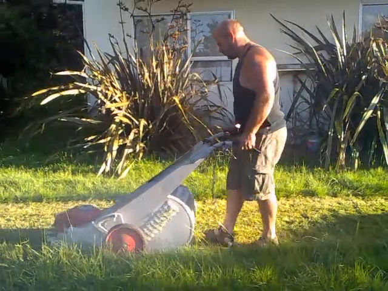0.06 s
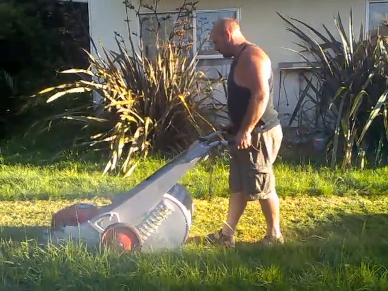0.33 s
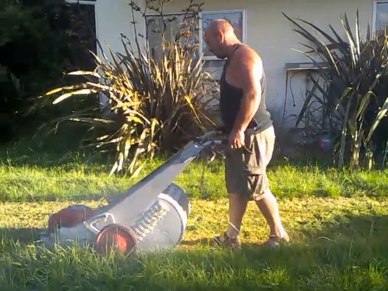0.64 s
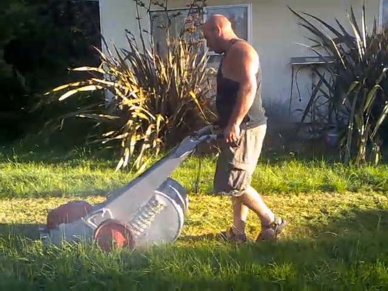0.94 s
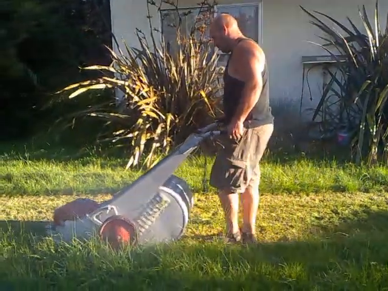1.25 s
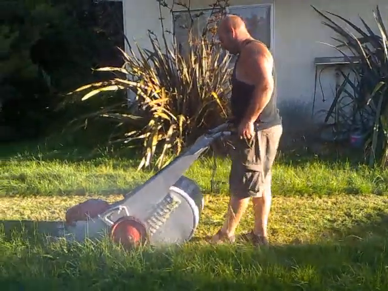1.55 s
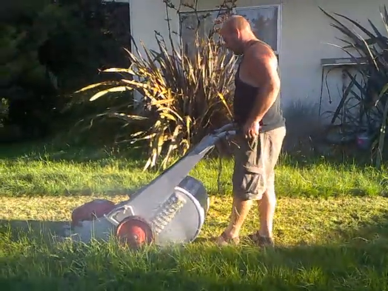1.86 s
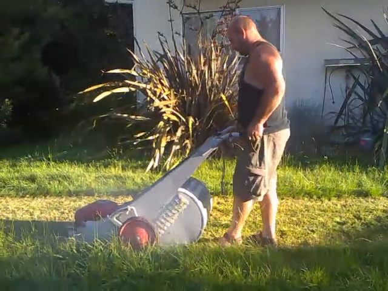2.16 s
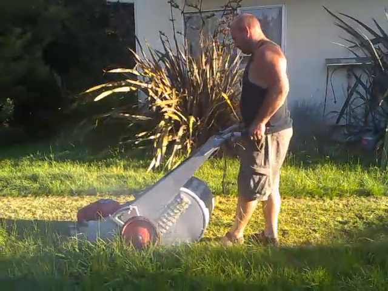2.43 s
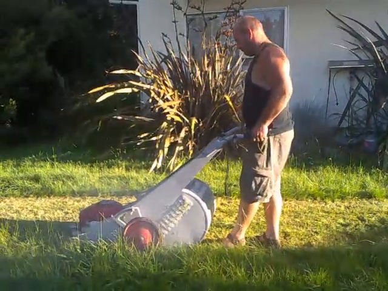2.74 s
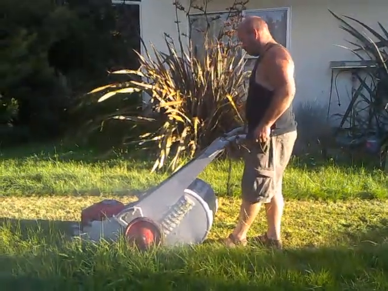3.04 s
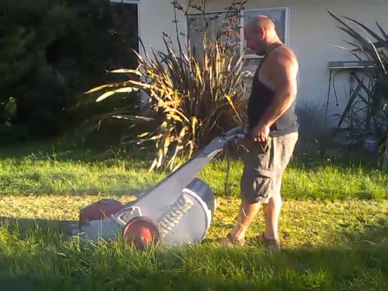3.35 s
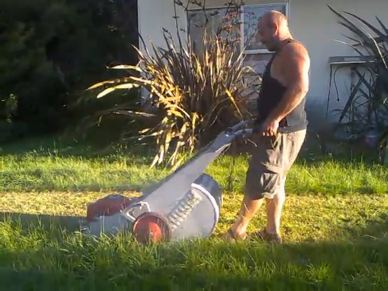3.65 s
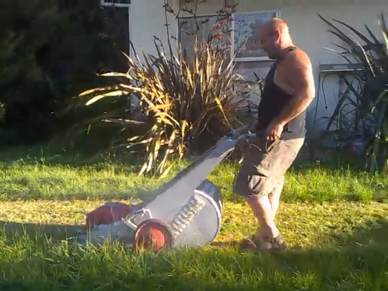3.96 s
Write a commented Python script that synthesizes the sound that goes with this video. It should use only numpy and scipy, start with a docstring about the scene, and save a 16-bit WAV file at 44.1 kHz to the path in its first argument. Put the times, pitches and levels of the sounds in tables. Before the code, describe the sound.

A running petrol mower is switched off and coasts to a rattling stop.

```python
"""A single-cylinder petrol mower runs on a lawn: each turn it gulps air, its ports ring the silencer
and its metal clatters, while the blade drones in the deck and ticks as if hitting twigs.
Switched off at 1.15 s, it coasts down into separate compression knocks, with faint chirps and a thin
squeak, and stops at 3.1 s. A few small clicks follow as it settles in the quiet garden."""
import sys
import numpy as np
from scipy import signal
from scipy.fft import rfft, irfft
from scipy.io import wavfile
from scipy.ndimage import uniform_filter1d

SR = 44100
rng = np.random.default_rng(int(sys.argv[2]) if len(sys.argv) > 2 else 0)


def wav_record(signal):
    """Record a signal, one row per channel, as 16-bit PCM in the file named by sys.argv[1]."""
    frames = np.transpose(np.atleast_2d(signal))
    bounded = np.clip(frames, -1, 1)
    # unit amplitude maps onto the largest positive 16-bit level
    quanta = np.round(bounded * 32767).astype(np.int16)
    wavfile.write(sys.argv[1], SR, quanta)


N = 176400


def undb(db):
    """Decibels to gain."""
    return 10 ** (np.asarray(db) / 20)


def unit(x):
    """Scale to rms 1."""
    return x / np.sqrt(np.mean(x ** 2))


def curve(table, column):
    """One table column, linear in time."""
    rows = np.array(table, float)
    return np.interp(np.arange(N) / SR, rows[:, 0], rows[:, column])


def noise():
    """White noise."""
    return rng.standard_normal(N)


def wander(samples):
    """Moving average of noise, rms 1."""
    return unit(uniform_filter1d(noise(), size=samples))


def ticks(per_s=2500, spread_db=.5):
    """Dense random clicks, rms 1."""
    signs = (rng.random(N) < per_s / SR) * np.sign(noise())
    return unit(signs * undb(spread_db * np.minimum(rng.exponential(size=N), 4)))


def impulses(times, sizes):
    """Impulses, each split between two samples."""
    out, at = np.zeros(N), np.clip(np.asarray(times) * SR, 0, N - 2)
    i = at.astype(int)
    np.add.at(out, i, sizes * (1 - at + i))
    np.add.at(out, i + 1, sizes * (at - i))
    return out


def conv(x, response):
    """Convolve and trim to N."""
    return signal.fftconvolve(x, response)[:N]


def colour(x, points, size=4096):
    """Minimum-phase filter of unit energy, shaped by (frequency [Hz], gain [dB]) points."""
    hz, db = np.array(points, float).T
    bins_hz = np.maximum(np.arange(size // 2 + 1) * SR / size, 1)
    gain = undb(np.interp(np.log(bins_hz), np.log(hz), db))
    cepstrum = irfft(np.log(gain))
    cepstrum[1:size // 2] *= 2
    cepstrum[size // 2 + 1:] = 0
    response = irfft(np.exp(rfft(cepstrum)))
    return conv(x, response / np.linalg.norm(response))


def no_bass(x, cut_hz=145):
    """Thin metal and turbulence radiate almost no bass."""
    return signal.sosfilt(signal.butter(4, cut_hz, "high", fs=SR, output="sos"), x)


def briskness(speed, slow_hz=11, brisk_hz=20):
    """1 while the shaft runs evenly, 0 once it labours from knock to knock."""
    return np.clip((speed - slow_hz) / (brisk_hz - slow_hz), 0, 1)


# shaft run-down (time [s], speed [turns/s])
SHAFT_SPEED = [(0.0, 44.42), (0.15, 43.89), (0.3, 43.62), (0.45, 43.06), (0.62, 41.58), (0.8, 40.78),
               (0.95, 40.48), (1.12, 39.76), (1.3, 36.62), (1.6, 30.43), (2.0, 23.54), (2.3, 18.94),
               (2.5, 12.89), (2.78, 9.27), (2.92, 6.03), (3.1, 0.0)]


def shaft():
    """Shaft speed and the running count of turns."""
    speed = curve(SHAFT_SPEED, 1)
    return speed, np.cumsum(speed) / SR


# relative engine levels (time [s], thump [dB], silencer [dB], clatter [dB], hiss [dB])
ENGINE_LEVELS = [(0, -34.5, -24, -25.5, -40), (0.4, -33, -22.5, -25, -40.5),
                 (0.7, -32, -23.5, -26.5, -42.5), (1.05, -29, -23, -27, -41),
                 (1.25, -35.5, -22, -28.5, -44), (1.45, -35, -23.5, -30, -48.5),
                 (1.7, -35.5, -24, -31.5, -49.5), (2, -37, -27.5, -32, -53.5),
                 (2.2, -36.5, -24, -33, -50.5), (2.45, -37.5, -28, -33.5, -51.5),
                 (2.65, -41.5, -31.5, -37, -51), (2.85, -38.5, -30, -35.5, -53.5),
                 (2.95, -53, -36, -46, -59.5), (3.08, -55, -32.5, -53, -60.5), (3.16, -65, -54.5, -76, -73),
                 (3.3, -83, -62, -52, -70)]


def thump(t, turns, speed, gulp_turns=.063, longest_s=.0017, rebound_turns=.17, gain_db=4.5):
    """The piston gulps air and shakes the body; coasting, air springs back and is pumped mid-turn too."""
    width = np.minimum(gulp_turns, longest_s * np.maximum(speed, 1))
    coasting = np.clip(t - 1.1, 0, 1)
    pulse = lambda place: np.exp(-.5 * (((turns - place + .5) % 1 - .5) / width) ** 2)
    gulp = lambda place: .36 * np.sqrt(coasting) * pulse(place + rebound_turns) - pulse(place)
    shake = .18 * (1 - coasting) ** 2 * np.cos(2 * np.pi * turns)
    air = gulp(0) * briskness(speed) + .51 * coasting * gulp(.5) - shake
    air = signal.sosfiltfilt(signal.butter(4, 36.2, "high", fs=SR, output="sos"), air)
    local_rms = np.sqrt(uniform_filter1d(air ** 2, size=SR // 4) + .001)
    return air / local_rms * undb(curve(ENGINE_LEVELS, 1) + gain_db)


# port edges (place [turns], firing strength [ratio], coasting strength [ratio])
PORT_EDGES = [(-.14, 0.66, 0.81), (0.144, -0.93, -0.34), (0.489, 0.74, .2)]
# silencer and deck response (frequency [Hz], gain [dB])
SILENCER_RESPONSE = [(60, -42.5), (130, -22.5), (200, -5), (290, -2), (420, -3), (540, 0.5), (660, 1.5),
                     (760, -16.5), (1000, -19), (1500, -16.5), (2500, -34), (6000, -75.5)]


def silencer(t, turns, speed, ignition_off_s=1.15, fade_s=.4, jitter_s=.00013, kick_db=-2.5, rush_db=-4):
    """Each port edge kicks the silencer; turbulent air rushes through the same cavity."""
    coasting = np.clip((t - ignition_off_s) / fade_s, 0, 1)
    kicks = 0
    for place, firing, unfired in PORT_EDGES:
        times = np.interp(np.arange(1, int(turns[-1])) + place, turns, t)
        strength = np.interp(times, t, firing + (unfired - firing) * coasting)
        kicks += impulses(times + jitter_s * rng.standard_normal(len(times)), strength)
    kicks *= briskness(speed) * np.sqrt(SR / (2 * np.maximum(speed, 20)))
    flow = undb(kick_db) * kicks + undb(rush_db) * no_bass(noise())
    return colour(flow * undb(curve(ENGINE_LEVELS, 2)), SILENCER_RESPONSE)


# relative blade harmonics (time [s], order 6 [dB], order 9 [dB], order 12 [dB], order 16 [dB])
BLADE_LEVELS = [(0, -22.5, -30.5, -17.5, -34.5), (0.15, -20, -30, -25.5, -38), (0.3, -23, -21, -26.5, -46),
                (0.5, -22, -22, -20, -20.5), (0.7, -24.5, -41, -25, -28.5), (0.87, -37, -42, -20.5, -32.5),
                (1.02, -40.5, -18.5, -25.5, -33), (1.25, -23.5, -27, -32, -36.5),
                (1.5, -45, -28.5, -37.5, -32.5), (2.0, -45, -47.5, -30, -48.5)]


def blade_drone(turns, speed, chute_turns=.1413, silent_hz=24, full_hz=31.3, gain_db=-5):
    """Shaft multiples swell, flicker and fade as they slide through the deck's resonances."""
    out = 0
    for column, order in enumerate((6, 9, 12, 16), start=1):
        flicker_db = wander(int(.03 * SR))
        level = undb(curve(BLADE_LEVELS, column) + gain_db + flicker_db)
        out -= np.sqrt(2) * level * np.cos(2 * np.pi * order * (turns - chute_turns))
    return out * np.clip((speed - silent_hz) / (full_hz - silent_hz), 0, 1)


# rattling metal (frequency [Hz], gain [dB])
METAL_SPECTRUM = [(200, 4), (600, -8.5), (800, -2.5), (1000, 0.5), (1250, 3.5), (1380, 1.5), (1500, 7.5),
                  (1650, 2.5), (1950, 2.5), (2250, -5), (2700, -3), (3150, -4.5), (3700, -13),
                  (5000, -20.5), (9000, -74)]
# hiss and fine ticks (frequency [Hz], gain [dB])
HISS_SPECTRUM = [(1500, -34), (3000, 3), (3600, 1.5), (4200, -5.5), (5000, 0), (5800, -7.5), (6700, -8.5),
                 (7400, -14.5), (8200, -16), (10000, -26), (11500, -38), (15000, -36)]


def clatter(turns, speed, lead_turns=.024, decay_turns=.8, hiss_gain_db=3):
    """Metal rattles and air hisses in a burst each turn, no two turns equally strong."""
    cycle = turns + lead_turns + 1
    scatter_db = noise()[cycle.astype(int)]
    burst = briskness(speed) * np.exp(-(cycle % 1) / decay_turns) * undb(scatter_db)
    metal = ticks() * unit(1 + .99 * burst) * undb(curve(ENGINE_LEVELS, 3))
    hiss = (ticks() + noise()) / np.sqrt(2) * unit(1 + 2.8 * burst)
    hiss *= undb(curve(ENGINE_LEVELS, 4) + hiss_gain_db)
    return no_bass(colour(metal, METAL_SPECTRUM) + colour(hiss, HISS_SPECTRUM))


# garden background (frequency [Hz], gain [dB])
GARDEN_SPECTRUM = [(15, -28.5), (25, -3.5), (59, 4.5), (196, -13.5), (558, -11), (637, -15.5), (2300, -22),
                   (3730, -24.5), (4040, -23.5), (5880, -29), (15000, -27)]


def garden(level_db=-65):
    """Faint, steady, mostly low noise."""
    return undb(level_db) * unit(colour(noise(), GARDEN_SPECTRUM))


# hard ticks, as of twigs on the blade (time [s], crack [dB], clink [Hz], clink [dB])
BLADE_STRIKES = [(.02, -13, 2700, -27), (.225, -20, 3600, -31), (.778, -20, 2900, -27),
                 (.839, -17, 2550, -20), (.988, -21, 1770, -25), (1.218, -17, 1560, -18)]


def strikes(t, decay_s=.005, clink_t60_s=.04, pair_ratio=1.11):
    """Short cracks through the metal deck, each with a clink of two close tones."""
    times, crack_db, _, _ = np.array(BLADE_STRIKES).T
    envelope = conv(impulses(times, undb(crack_db)), np.exp(-t / decay_s))
    out = colour(envelope * noise(), METAL_SPECTRUM)
    for when, _, hz, clink_db in BLADE_STRIKES:
        age = np.clip(t - when, 0, 1)
        phase = 2 * np.pi * hz * age
        out += undb(clink_db - 60 * age / clink_t60_s) * (np.sin(phase) + .5 * np.sin(pair_ratio * phase))
    return no_bass(out)


# engine knocks against the deck, relative levels (time [s], rattle [dB], ring [dB])
ENGINE_KNOCKS = [(1.558, -20, -22), (1.592, -30, -22), (1.809, -19, -21), (2.130, -21, -36),
                 (2.177, -15, -26), (2.228, -17, -26), (2.28, -25, -23), (2.335, -20, -22),
                 (2.392, -24, -22), (2.464, -22, -32), (2.485, -24, -27), (2.534, -22, -26),
                 (2.55, -19.5, -23), (2.63, -17.5, -24), (2.719, -19, -15.5), (2.753, -26, -29),
                 (2.827, -20.5, -13.5), (2.845, -25, -32), (2.996, -23.5, -19), (3.019, -27.5, -32),
                 (3.066, -28.5, -31)]
# main deck modes (frequency [Hz], gain [dB], t60 [s])
MAIN_MODES = [(620, 6.5, .052), (665, -2, .045)]
# weaker deck modes (frequency [Hz], gain [dB], t60 [s])
WEAK_MODES = [(302.5, -8, 0.15), (380, -7.5, 0.079), (527, -21, 0.082), (600, -13.5, 0.032),
              (1245, -9.5, 0.075), (1457, -7.5, 0.084), (1600, -10, 0.05), (1980, -21, 0.073),
              (2740, -37, 0.029)]


def knocks(t, push_s=.0062, rattle_s=.02, rattle_gain_db=-10, hiss_gain_db=-34.5, size=13000):
    """Compression jolts the slowing engine: the deck rings and loose parts rattle."""
    age, ring = t[:size], np.zeros(N + size)
    push = 1 - np.exp(-age / push_s)
    for when, _, ring_db in ENGINE_KNOCKS:
        for hz, mode_db, t60 in [*MAIN_MODES, *WEAK_MODES]:
            detuned_hz = hz * (1 + .012 * rng.standard_normal())
            envelope = push * undb(ring_db + mode_db - 60 * age / t60)
            ring[int(when * SR):][:size] += envelope * np.sin(2 * np.pi * detuned_hz * age)
    times, rattle_db, _ = np.array(ENGINE_KNOCKS).T
    shake = conv(impulses(times, undb(rattle_db)), np.exp(-age / rattle_s))
    rattle = undb(rattle_gain_db) * no_bass(colour(shake * ticks(), METAL_SPECTRUM))
    hiss = undb(hiss_gain_db) * colour(shake * noise(), HISS_SPECTRUM)
    return ring[:N] + rattle + hiss


# faint high chirps (time [s], pitch [Hz], level [dB])
HIGH_CHIRPS = [(2.155, 4300, -49), (3.035, 4850, -57), (3.545, 4700, -75), (3.64, 4200, -73)]


def chirps(t, width_s=.014, fall_hz_per_s=4000):
    """Brief, wavering, falling tones."""
    out, waver = 0, 1 + .05 * wander(60)
    for when, hz, db in HIGH_CHIRPS:
        pitch_hz = (hz - fall_hz_per_s * (t - when)) * waver
        envelope = undb(db) * np.exp(-.5 * ((t - when) / width_s) ** 2)
        out += envelope * np.sin(2 * np.pi * np.cumsum(pitch_hz) / SR)
    return out


# shaft squeak (time [s], pitch [Hz], level [dB])
SHAFT_SQUEAK = [(2.65, 4300, -60), (2.675, 4100, -44), (2.71, 3950, -52), (2.78, 3800, -52),
                (2.86, 3680, -57), (2.92, 3620, -68)]


def squeak(t):
    """A thin, unsteady tone that falls as the shaft slows."""
    hz = curve(SHAFT_SQUEAK, 1) * (1 + .021 * wander(60))
    gate = (t > SHAFT_SQUEAK[0][0]) * (t < SHAFT_SQUEAK[-1][0])
    return gate * undb(curve(SHAFT_SQUEAK, 2)) * np.sin(2 * np.pi * np.cumsum(hz) / SR)


# mower and handle clicks, relative levels (time [s], snap [dB], body [Hz], body [dB], body t60 [s])
SETTLING_CLICKS = [(3.219, -46, 1100, -58, .03), (3.22, -48, 4500, -59, .04), (3.787, -54, 3700, -56, .015),
                   (3.8, -34, 1050, -29, .014), (3.801, -48, 540, -25, .014), (3.9395, -35, 170, -30, .028),
                   (3.941, -46, 520, -40, .03), (3.979, -65, 1020, -37, .022), (3.989, -62, 950, -46, .02),
                   (3.995, -60, 1200, -44, .02)]
# snap of a click (frequency [Hz], gain [dB])
SNAP_SPECTRUM = [(100, -17), (450, 0), (1100, -5.5), (2000, -3), (3500, -10.5), (4700, -25), (6000, -21),
                 (7000, -26), (9000, -45), (15000, -45)]


def clicks(t, snap_s=.002, tail_s=.0076, tail_db=-19, lag_s=.00175, chatter_s=.012, chatter_db=-44):
    """The mower settles: a snap with a faint tail, then a hollow ring roughened by chattering contact."""
    out, ring_t = 0, t[:4096]
    for when, snap_db, hz, body_db, t60 in SETTLING_CLICKS:
        age = np.maximum(t - when, 0)
        snap = (age > 0) * noise() * (np.exp(-age / snap_s) + undb(tail_db) * np.exp(-age / tail_s))
        chatter = undb(chatter_db) * (age > 0) * noise() * np.exp(-age / chatter_s)
        contact = impulses([when + lag_s], .83) + chatter
        body = undb(body_db - 60 * ring_t / t60) * np.sin(2 * np.pi * hz * ring_t)
        out += undb(snap_db) * no_bass(colour(snap, SNAP_SPECTRUM)) + conv(contact, body)
    return out


def echo(x, t, delay_s=.006, decay_s=.02, gain_db=-15):
    """Short scatter from house and shrubs."""
    scatter = noise() * np.exp(-t / decay_s) * (t > delay_s)
    return undb(gain_db) * conv(x, scatter / np.linalg.norm(scatter))


def scene():
    """The mower, its echo and the still garden, in mono."""
    t = np.arange(N) / SR
    speed, turns = shaft()
    running = np.clip((ENGINE_LEVELS[-1][0] - t) / .07, 0, 1)
    hum = running * (thump(t, turns, speed) + blade_drone(turns, speed))
    near = running * (silencer(t, turns, speed) + clatter(turns, speed))
    near += strikes(t) + knocks(t) + chirps(t) + squeak(t) + clicks(t)
    return (hum + near + echo(near, t) + garden())[None]


def record(dry):
    """Steep low-pass at 15650 Hz."""
    return signal.sosfilt(signal.ellip(10, .2, 70, 15650, fs=SR, output="sos"), dry)


dry = scene()
out = record(dry)
wav_record(out)
```